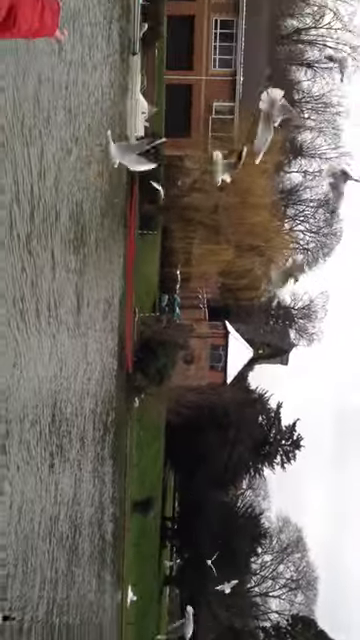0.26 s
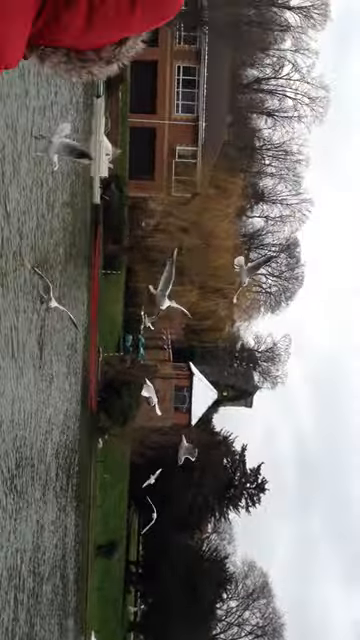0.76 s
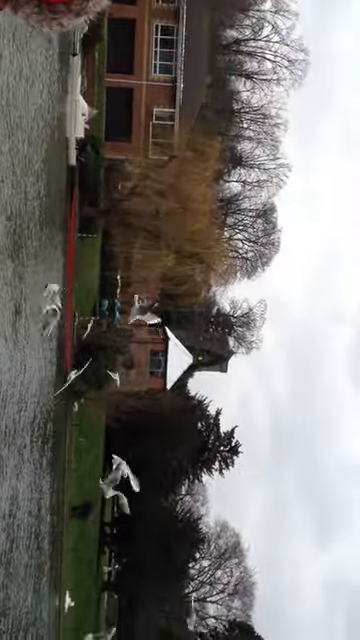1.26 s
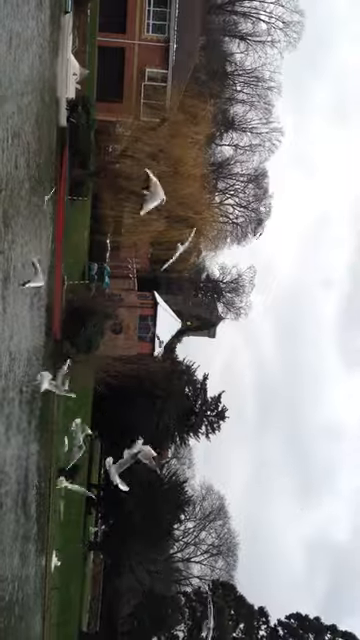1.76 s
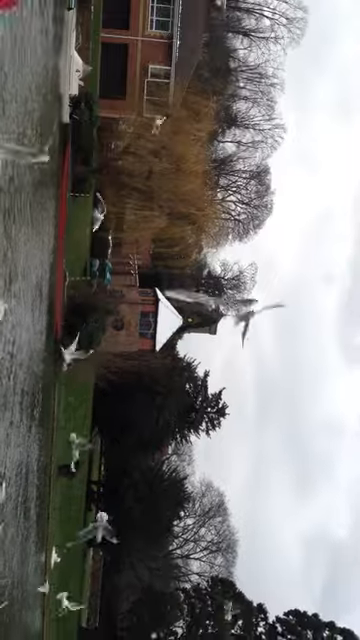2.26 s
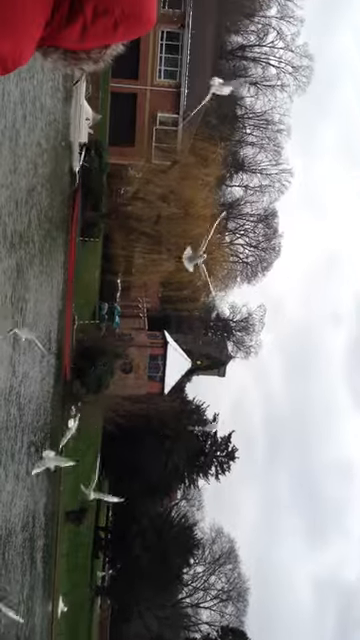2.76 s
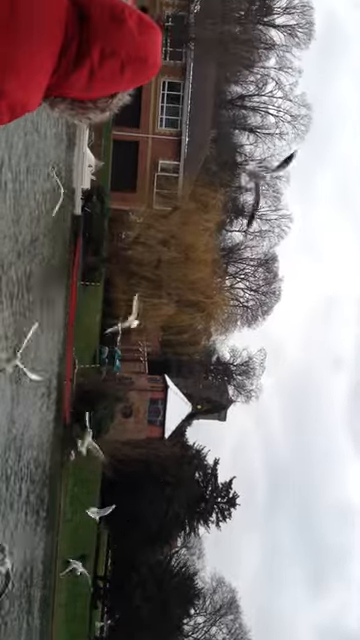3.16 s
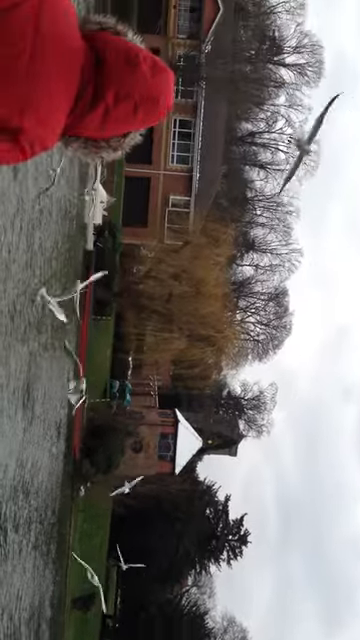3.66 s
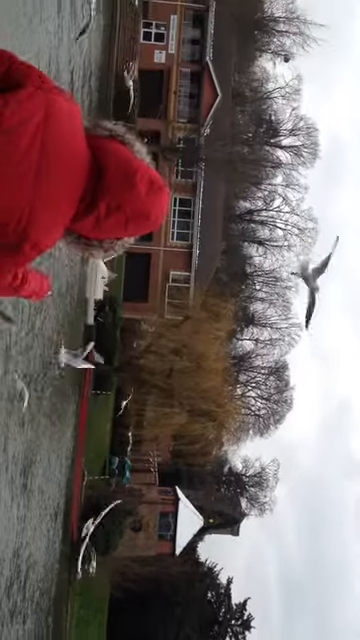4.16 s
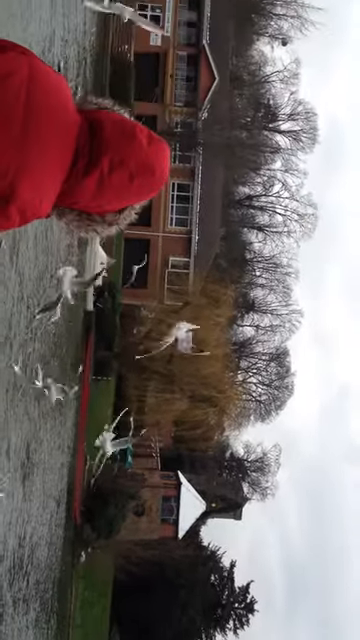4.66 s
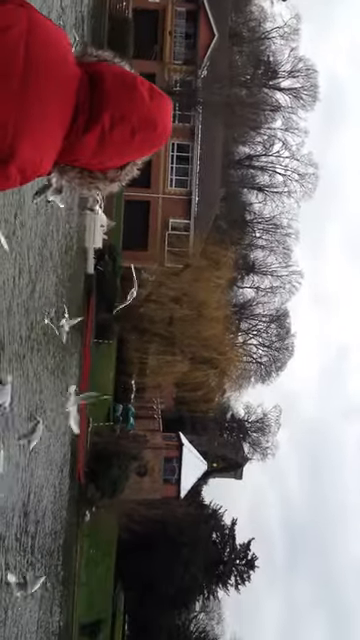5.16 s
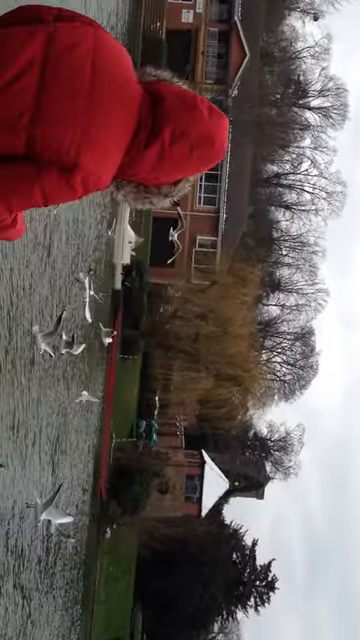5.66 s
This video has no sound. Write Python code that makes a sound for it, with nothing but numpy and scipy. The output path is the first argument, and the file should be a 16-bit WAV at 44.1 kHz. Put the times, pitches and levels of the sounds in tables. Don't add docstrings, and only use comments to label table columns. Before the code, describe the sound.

Gulls yelp and squawk in short harsh bursts over a lake, with wind thumping the microphone and a jacket rustling at first.

```python
import sys
import numpy as np
from scipy import signal
from scipy.fft import rfft, irfft
from scipy.io import wavfile
from scipy.ndimage import uniform_filter1d

SR = 44100
rng = np.random.default_rng(int(sys.argv[2]) if len(sys.argv) > 2 else 0)


def decibels_to_gain(level_db):
    exponent = np.asarray(level_db, float) / 20
    return 10 ** exponent


def generate_wav(signal):
    frames = np.transpose(np.atleast_2d(signal))
    scaled = np.clip(frames, -1, 1) * 32767
    pcm = np.round(scaled).astype(np.int16)
    wavfile.write(sys.argv[1], SR, pcm)


N = 261411


def evened(x):
    return x / np.sqrt(np.mean(x ** 2) + 1e-20)


def add(mix, start_s, sound):
    part = mix[round(start_s * SR):][:len(sound)]
    part += sound[:len(part)]


def along(rows):
    return np.interp(np.arange(N) / SR, *np.transpose(rows))


def colour(x, points):
    hz, db = np.transpose(points)
    log_hz = np.log(np.abs(np.fft.fftfreq(8192, 1 / SR)) + 1)
    log_gain = np.log(decibels_to_gain(np.interp(log_hz, np.log(hz), np.maximum(db, -100))))
    taps = np.fft.ifft(np.exp(np.conj(signal.hilbert(log_gain)))).real[:4096]
    return signal.oaconvolve(x, taps)[:len(x)]


def wander(count, smooth):
    size = max(int(smooth), 2)
    once = uniform_filter1d(rng.standard_normal(count), size)
    return evened(uniform_filter1d(once, size))


def peak(hz, centre_hz, width_hz):
    return 1 / (1 + ((hz - centre_hz) / width_hz) ** 2)


# frequency in Hz, density in dB per Hz.
WASH_SPECTRUM = [(210, -37), (350, -2.5), (417, 1.5), (855, 3), (2650, -13.5), (3160, -15.5), (4340, -16),
                 (5340, -21.5), (7840, -19), (9790, -27), (14600, -19.5), (15800, -22)]


def wash():
    swell_db = 0.8 * wander(N, 2500)
    level_db = -55 + 3.0
    return decibels_to_gain(level_db + swell_db) * evened(colour(rng.standard_normal(N), WASH_SPECTRUM))


# time in seconds, level in dB.
WIND_LEVEL = [(0.0, -37), (0.13, -28.5), (0.2, -35), (0.58, -31), (1.01, -41.5), (2.99, -37.5), (3.07, -26),
              (3.1, -42), (3.75, -39), (4.95, -41), (5.5, -34), (5.93, -34.5)]
# frequency in Hz, density in dB per Hz.
BUFFET_SPECTRUM = [(15, -96), (25, -43.5), (105, -7), (151, 2), (303, -7), (376, -16.5), (712, -30),
                   (800, -49), (1040, -51), (1760, -120)]
# start in seconds, peak level in dB.
THUMPS = [(0.013, -28.5), (0.11, -21.5), (0.162, -25), (0.277, -22.5), (0.337, -27.5), (0.421, -22),
          (0.554, -32), (0.611, -19), (0.727, -28), (0.807, -31.5), (1.417, -30.5), (1.618, -33),
          (1.773, -31), (2.332, -30.5), (2.436, -26.5), (2.491, -27.5), (2.683, -26), (2.842, -27),
          (3.026, -31), (3.065, -30), (3.616, -35.5), (4.077, -30.5), (4.277, -30.5), (4.985, -32),
          (5.152, -27), (5.348, -29), (5.421, -26.5), (5.497, -23.5), (5.727, -36), (5.786, -34.5)]


def wind():
    lumps_db = 3.74 * wander(N, 100) + 2.3 * wander(N, 920)
    pushes = rng.standard_normal(N) * decibels_to_gain(lumps_db)
    out = decibels_to_gain(along(WIND_LEVEL) - 2.5) * evened(colour(pushes, BUFFET_SPECTRUM))
    t = np.arange(3000) / SR
    for start_s, peak_db in THUMPS:
        burst = rng.standard_normal(len(t)) * decibels_to_gain(-60 * t / 0.1)
        gust = colour(burst, BUFFET_SPECTRUM)
        add(out, start_s, decibels_to_gain(peak_db) * gust / abs(gust).max())
    return out


# time in seconds, level in dB.
RUSTLE_LEVEL = [
    (0.0, -48),
    (1.01, -66),
    (2.95, -83),
    (3.3, -62),
    (4.01, -73.5),
    (5.93, -72.5),
]
# frequency in Hz, density in dB per Hz.
CLOTH_SPECTRUM = [(710, -8), (1200, -18), (1550, -20), (3010, -13), (8150, -9), (15500, -13)]
# start in seconds, peak level in dB, level of the lower part in dB.
SNAPS = [(0.1478, -33, 1), (0.2079, -29, -20), (0.2794, -63.5, -7), (0.321, -23, -25), (0.64, -34, 0),
         (2.2282, -42, -2), (2.2857, -55, -6), (2.4224, -41, 6), (2.4638, -48, -9), (2.5444, -44, -5),
         (2.7077, -43, -19)]


def jacket():
    crackle_db = 2.5 * wander(N, 60) + 1.6 * wander(N, 900)
    grains = rng.standard_normal(N) * decibels_to_gain(crackle_db)
    out = decibels_to_gain(along(RUSTLE_LEVEL) + 5.5) * evened(colour(grains, CLOTH_SPECTRUM))
    t = np.arange(400) / SR
    for start_s, peak_db, low_db in SNAPS:
        burst = rng.standard_normal(len(t)) * decibels_to_gain(-60 * t / 0.0075)
        spectrum = [(1500, low_db - 18), (3000, low_db), (8000, low_db), (11000, 0), (16000, 0)]
        snap = colour(burst, spectrum)
        add(out, start_s, decibels_to_gain(peak_db) * snap / abs(snap).max())
    return out


def shore(x):
    t = np.arange(SR // 2) / SR
    sparse = rng.random(len(t)) < 0.05
    decay = decibels_to_gain(-60 * t / 0.5) * (t > 0.012)
    taps = rng.standard_normal(len(t)) * sparse * decay
    taps = colour(taps, [(1000, -10), (2000, 0), (4500, -1), (7000, -10), (16000, -16)])
    scattered = x * (0.5 + wander(N, 50))
    return signal.oaconvolve(scattered, taps / np.linalg.norm(taps))[:N]


def vocal_tract(f, throat):
    beak_hz, windpipe_db, upper_db, echo_ms = throat
    tract = peak(f, beak_hz, 990)
    tract += decibels_to_gain(windpipe_db) * peak(f, 1630, 520)
    tract += decibels_to_gain(upper_db) * peak(f, 6500, 4500)
    tract /= np.sqrt(1 + (1300 / (f + 1)) ** 4) * np.sqrt(1 + (f / 9000) ** 12)
    return tract * (1 + 0.39 * np.exp(-2j * np.pi * f * echo_ms / 1000))


def yelp(rows, voice, throb_hz, throat):
    s, effort_db, pitch_hz = np.transpose(rows)
    rough, depth = np.clip(voice, 0, 1)
    upper_db = throat[2]
    fade_s = 0.008
    t = np.arange(s[0] - fade_s, s[-1] + fade_s, 1 / SR)
    count = len(t)
    beat = throb_hz * (t - s[np.argmax(effort_db)])

    to_centre_s = (np.round(beat) - beat) / throb_hz
    held_hz = np.interp(t + np.minimum(3.4 * depth, 1) * to_centre_s, s, pitch_hz)
    waver = 0.051 * rough * wander(count, 40) + 0.06 * rough * wander(count, 260)
    turns = np.cumsum(uniform_filter1d(held_hz, 60) * (1 + waver)) / SR

    flicker_db = [(3.0 + 1.35 * rough) * wander(count, 470) for k in range(12)]
    flicker_db[1] += 0.4 * throat[1] - 6.0
    top = min(int(9800 / pitch_hz.max()), 11)
    pulses = sum(decibels_to_gain(flicker_db[k]) * np.cos(2 * np.pi * k * turns + 0.169 * k ** 2)
                 for k in range(1, top + 1))
    puffs = evened((0.3 + np.exp(-(turns % 1) / 0.25)) * rng.standard_normal(count))

    effort_db = uniform_filter1d(np.interp(t, s, effort_db), 250)
    noisy = np.clip(0.85 * rough * decibels_to_gain(0.2 * (effort_db.max() - effort_db)), 0, 1)
    dip_phase = beat + 0.06 * wander(count, 500)
    dip = np.clip(1.75 * depth, 0, 0.9) * np.sin(np.pi * dip_phase) ** 4
    shape = decibels_to_gain(effort_db)
    shape *= signal.windows.tukey(count, min(4 * fade_s / (t[-1] - t[0]), 1))

    size = count + 256
    f = np.fft.rfftfreq(size, 1 / SR)
    tone = np.sqrt(1 - noisy ** 2) * evened(pulses * (1 - dip))
    breath = 1.9 * noisy * puffs * (1 - 0.4 * dip)
    voiced = irfft(rfft((tone + breath) * shape, size) * vocal_tract(f, throat), size)
    voiced *= np.linalg.norm(shape) / np.linalg.norm(voiced)
    top_band = peak(f, 12800, 2200) * (f > 9800)
    top_hiss = irfft(rfft(puffs * (1 - dip) * shape, size) * top_band, size)
    return max(t[0], 0), voiced + decibels_to_gain(0.43 * upper_db - 1.5) * top_hiss


VOICE = dict(clear=(.15, .12), trill=(.34, .46), gargle=(.48, .42), slide=(.5, .4), yelp=(.46, .2),
         yap=(.5, .16), croak=(.68, .12), scream=(.72, .1), rise=(.31, .13), whistle=(.13, .18),
         bark=(.3, .36), chip=(.15, .05), drone=(.42, .45), rasp=(.62, .18), chatter=(.52, .44),
         swell=(.33, .43), peep=(.1, .27))
# throbs in Hz, beak resonance in Hz, upper resonance in dB,
# lag of a close reflection in ms.
THROAT = dict(clear=(79, 3360, -19.5, 0.9), trill=(74, 3843, -17.5, 2.2), gargle=(77.5, 2910, -12, 0.7),
          slide=(67, 3852, -7.5, -0.2), yelp=(76, 3350, -17, 2.3), yap=(68, 3987, -15, -0.86),
          croak=(75, 3160, -11, 0.2), scream=(84, 3830, -15, 1.8), rise=(81, 3750, -14, 1.8),
          whistle=(73, 3300, -15, -0.1), bark=(85.5, 3200, -16.5, 1.3), swell=(55.5, 4399, -17, 0.4),
          peep=(62, 3000, -34, 1.7), chip=(61, 3600, -22, -0.5), drone=(93.5, 2800, -5, .21),
          rasp=(82, 3698, -11.5, 0.5), chatter=(76, 3700, -12.5, 0.42))
# attack as a share of length, release as a share of length,
# change while held in dB, start level in dB, end level in dB.
EFFORT = dict(clear=(0.24, 0.44, -2, -23, -24), trill=(0.46, 0.33, -2.5, -15.5, -16),
          gargle=(0.22, 0.4, -4, -12, -8.5), slide=(0.2, 0.2, -5.5, 0.5, -5),
          yelp=(.28, 0.26, 1.5, -15.5, -23), yap=(0.2, 0.35, -2.5, -11, -18),
          croak=(0.14, 0.05, -2, -27, -23), scream=(0.18, .1, -9, -18.5, -13),
          rise=(0.3, 0.75, 1.5, -13, -2.5), whistle=(.2, 0.3, -10, -24, -4),
          bark=(0.23, 0.42, -0.5, -19, -14.5), swell=(0.57, .35, -4.5, -18, -32),
          peep=(0.3, 0.4, -6, -9, -12), chip=(0.5, 0.47, -3, -18, -28), drone=(0.33, 0.1, -3, -4.5, -6),
          rasp=(0.29, .4, -4, -13, -30), chatter=(.38, 0.34, -2.5, -17, -22))
BEND = dict(clear=(.95, .965, .74), trill=(.89, .98, .83), gargle=(.91, .97, .91), slide=(1.05, .93, .84),
        yelp=(.92, .99, .84), yap=(.97, .97, .9), croak=(.97, 1.02, .95), scream=(.9, .93, .93),
        rise=(.95, 1.12, 1.22), whistle=(.985, .985, .9), bark=(.81, .98, .77), swell=(.82, 1.02, .97),
        peep=(1.01, .98, .96), chip=(.97, .995, .95), drone=(.8, 1.07, 1.06), rasp=(.96, .98, .9),
        chatter=(.9, .95, .84))


def call(kind, start, length, effort_db, pitch_hz, windpipe_db):
    attack, release, held_db, start_db, end_db = EFFORT[kind]
    first, held, last = BEND[kind]
    throb_hz, beak_hz, upper_db, echo_ms = THROAT[kind]
    upper_db = upper_db + 0.2 * (effort_db - -31)
    u = np.linspace(0, 1, num=40)
    shut = np.clip(1 - u / attack, 0, 1)
    holding = np.clip((u - attack) / max(1 - attack - release, 1e-3), 0, 1)
    closing = np.clip(1 - (1 - u) / release, 0, 1)
    effort_db = effort_db + start_db * shut + held_db * holding + (end_db - held_db) * closing ** 1.4
    bend = 1 + (first - 1) * shut ** 2 + (held - 1) * holding + (last - held) * closing ** 1.6
    rows = np.transpose([start + length * u, effort_db, pitch_hz * bend])
    return yelp(rows, VOICE[kind], throb_hz, (beak_hz, windpipe_db, upper_db, echo_ms))


# start in seconds, length in seconds, effort in dB,
# pitch in Hz, windpipe resonance in dB.
CLEAR = [
    (1.657, 0.076, -25.5, 1138, -2),
]
BARKS = [
    (0.938, 0.08, -25.5, 1090, -0.5),
    (4.122, 0.066, -35, 1004, 0.5),
    (4.256, 0.062, -25, 1072, -1.5),
]
TRILLS = [
    (4.308, 0.058, -30.5, 1174, -2),
    (4.674, 0.052, -30, 861, -5),
    (4.9, 0.093, -22, 1094, -6),
    (5.016, 0.055, -26, 1255, -6),
]
GARGLES = [
    (1.212, 0.067, -35.5, 895, 23),
    (1.328, 0.049, -35.5, 960, -3),
    (1.778, 0.051, -41.5, 790, 3),
    (4.78, 0.12, -35, 787, 8),
]
SLIDES = [
    (3.256, 0.046, -35, 1235, -2),
    (3.352, 0.088, -39, 996, 6.5),
    (3.695, 0.055, -38.5, 958, -5),
    (5.432, 0.08, -43.5, 920, 0),
]
YELPS = [
    (0.052, 0.064, -26.5, 965, -8.5),
    (1.2, 0.044, -32, 990, -12),
    (1.42, 0.066, -45, 767, 16),
    (3.305, 0.069, -35.5, 1272, -13),
    (4.64, 0.05, -38, 1050, 3),
    (3.74, 0.068, -32, 1088, -1.5),
]
YAPS = [
    (0.75, 0.061, -37.5, 1105, 3),
    (4.718, 0.059, -34.5, 964, -5),
    (4.982, 0.058, -33, 1132, -2),
    (5.782, 0.068, -32.5, 774, 4.5),
]
CROAKS = [
    (0.575, 0.047, -50, 840, -3),
    (2.735, 0.034, -54.5, 834, 4),
    (5.07, 0.035, -44, 1017, 9),
    (1.932, 0.12, -45.5, 1253, -26),
    (3.853, 0.079, -41, 978, -6),
    (3.922, 0.054, -39, 1143, 2),
    (4.085, 0.043, -36.5, 980, -6),
    (4.515, 0.074, -50, 969, 10.5),
]
SCREAMS = [
    (1.975, 0.2, -37.5, 1107, -0.5),
    (3.05, 0.27, -30, 1037, -4),
]
RISES = [
    (3.558, 0.055, -35, 730, -6),
    (4.058, 0.043, -35, 735, -15),
]
SWELLS = [
    (5.142, 0.092, -26.5, 986, -6),
]
WHISTLES = [
    (3.147, 0.122, -28, 3004, 2.8),
]
PEEPS = [
    (3.312, 0.046, -33, 2550, 9),
    (4.205, 0.0578, -39.5, 2680, 4.2),
    (3.788, 0.04, -28.5, 3180, 13),
]
CHIPS = [
    (1.022, 0.034, -21, 1026, -5),
    (3.68, 0.0216, -30.5, 993, -18),
]
DRONES = [
    (1.048, 0.165, -35.5, 1026, 13.3),
]
RASPS = [
    (2.857, 0.062, -32.5, 810, -6),
    (2.335, 0.062, -33, 1040, 2.5),
    (3.444, 0.068, -27.5, 1175, -9),
    (3.594, 0.064, -29.5, 920, -10),
    (3.822, 0.025, -42, 860, 6),
    (1.532, 0.078, -34.5, 1130, 2.5),
]
CHATTERS = [
    (0.388, 0.082, -28, 986, 2),
    (5.35, 0.0853, -30.5, 1026, 6),
    (5.634, 0.05, -36, 801, -4),
]
FLOCK = dict(clear=CLEAR, bark=BARKS, trill=TRILLS, gargle=GARGLES, slide=SLIDES, yelp=YELPS,
             yap=YAPS, croak=CROAKS, scream=SCREAMS, rise=RISES, swell=SWELLS, whistle=WHISTLES,
             peep=PEEPS, chip=CHIPS, drone=DRONES, rasp=RASPS, chatter=CHATTERS)


def flock():
    gulls = np.zeros(N)
    for kind, rows in FLOCK.items():
        for row in rows:
            add(gulls, *call(kind, *row))
    return gulls


def scene():
    gulls = flock()
    echoes = decibels_to_gain(-22) * shore(gulls)
    return (wash() + wind() + jacket() + echoes + gulls)[None]


def roll_off(x):
    return signal.sosfilt(signal.butter(12, 16220, fs=SR, output="sos"), x)


def record(dry):
    low_pass = signal.firwin(401, 15500, window=("kaiser", 8), fs=SR)
    cut = signal.oaconvolve(dry, low_pass[None], "same")
    return roll_off(cut)


dry = scene()
out = record(dry)
generate_wav(out)
```